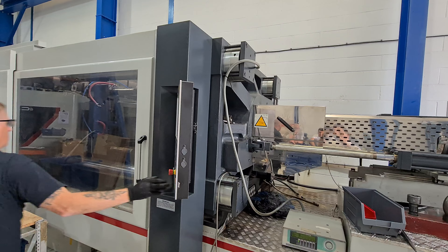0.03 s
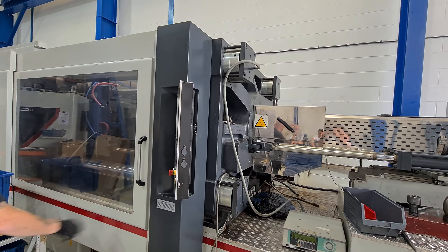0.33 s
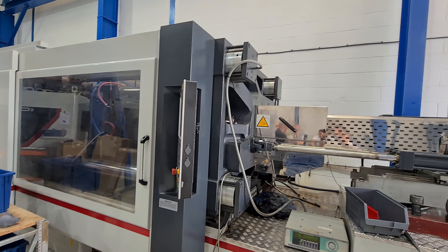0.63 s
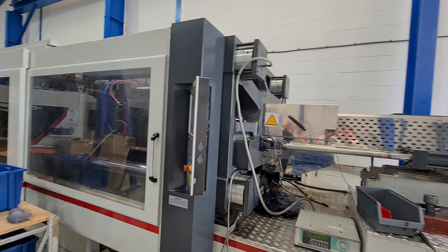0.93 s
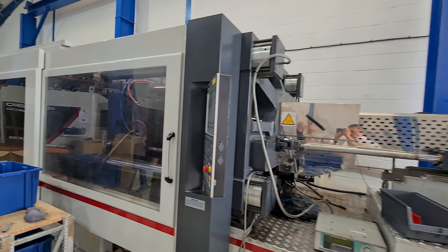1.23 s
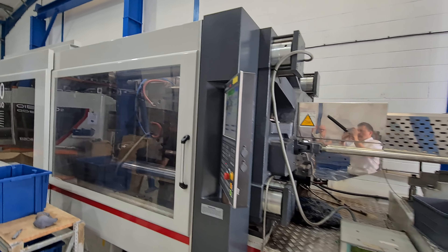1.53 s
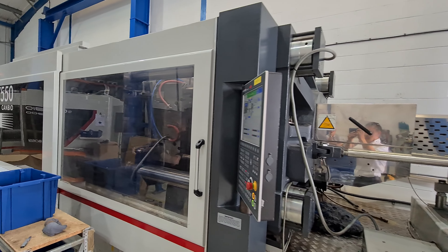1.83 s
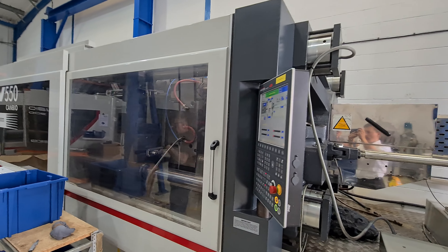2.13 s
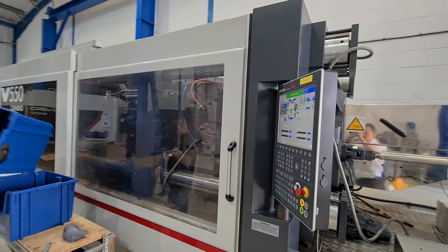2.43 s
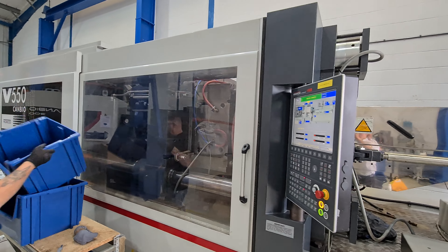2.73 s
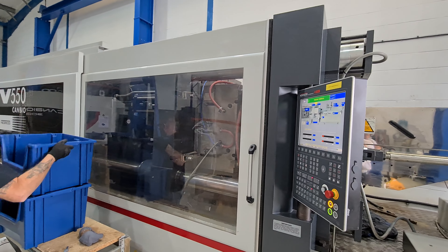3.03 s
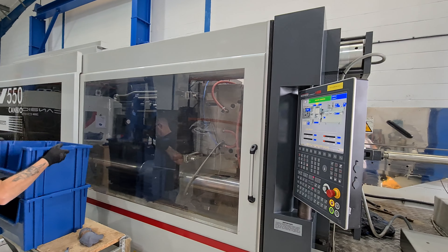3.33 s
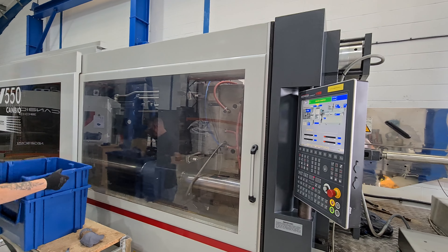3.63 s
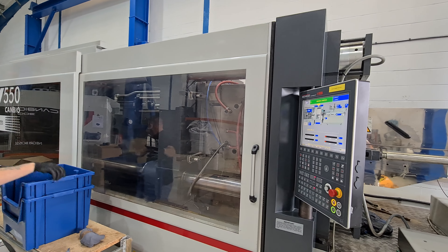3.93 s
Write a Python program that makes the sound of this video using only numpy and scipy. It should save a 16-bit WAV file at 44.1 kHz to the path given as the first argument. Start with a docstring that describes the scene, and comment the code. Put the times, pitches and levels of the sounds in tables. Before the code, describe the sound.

An injection moulding machine drones close by in a factory hall, its strong pump tone over a low motor hum and fans. The tone fades from about 2 to 3 seconds. A dull knock sounds far off near 2.1 seconds, and compressed air swells, peaking at 2.6. From 2.7 seconds an empty plastic crate drops into another, knocking and rubbing as it is shuffled into place until 3.8.

```python
"""The hydraulic pump of an injection moulding machine sings one strong tone, its second shaft order,
which fades over a second pump, a beating motor hum and the wash of fans in a factory hall.
Compressed air swells and dies away, and a dull knock sounds far off. Close by, an empty plastic crate
is dropped into another and shuffled into place: knocks, rubbing and a judder ring its walls."""
import sys
import numpy as np
from scipy import signal
from scipy.fft import rfft, irfft
from scipy.io import wavfile
from scipy.ndimage import uniform_filter1d

SR = 44100
rng = np.random.default_rng(int(sys.argv[2]) if len(sys.argv) > 2 else 0)


def transcribe(signal):
    """Save signal, clipped to [-1, 1], as a 16-bit WAV file at the path in sys.argv[1]."""
    frames = np.atleast_2d(signal).T
    limited = np.clip(frames, -1, 1)
    pcm = np.round(limited * 32767).astype(np.int16)
    wavfile.write(sys.argv[1], SR, pcm)


N = 176400
TIME = np.arange(N) / SR
SIDES = np.array([[1], [-1]])   # left, right; positive pan_db is left

# left-right likeness of the hall sound: freq_hz, correlation
COHERENCE = [(60, .99), (150, .98), (250, .93), (500, .68), (1000, .08), (2000, 0)]


def from_db(db):
    """Decibels to gain."""
    return 10 ** (np.asarray(db) / 20)


def unit_rms(x):
    """Scale to unit power."""
    return x / np.sqrt(np.mean(x ** 2) + 1e-20)


def in_time(rows):
    """Join (time_s, value) points by straight lines."""
    return np.interp(TIME, *np.transpose(rows))


def at_hz(points, hz):
    """Read (freq_hz, value) points on a log-frequency axis."""
    freqs_hz, values = np.transpose(points)
    return np.interp(np.log(hz), np.log(freqs_hz), values)


def pan(db):
    """Left and right gains at constant total power."""
    return unit_rms(from_db(SIDES * db / 2))


def drift(rate_hz):
    """Slow random motion, rms about 1."""
    pole = np.exp(-200 * np.pi * rate_hz / SR)
    slow = signal.lfilter([1], [1, -2 * pole, pole * pole], rng.standard_normal(N // 100 + 2002))[2000:]
    return np.interp(np.arange(N) / 100, np.arange(len(slow)), unit_rms(slow))


def dull(x, hz):
    """First-order low-pass."""
    return signal.sosfilt(signal.butter(1, min(hz, SR / 2 - 1000), fs=SR, output="sos"), x + 1e-18)


def gate(start_s, length_s, edge_s):
    """Envelope with linear fades in and out."""
    return np.clip(np.minimum(TIME - start_s, start_s + length_s - TIME) / edge_s, 0, 1)


def clicks(times_s, db):
    """One impulse per event."""
    out = np.zeros(N)
    np.add.at(out, np.clip((np.asarray(times_s) * SR).astype(int), 0, N - 1), from_db(db))
    return out


def decay(hits, t60_s):
    """Each impulse starts an exponential fade."""
    return signal.lfilter([1], [1, -from_db(-60 / (t60_s * SR))], hits + 1e-18)


def ring(hits, hz, t60_s):
    """Each impulse starts a damped sine."""
    r, w = from_db(-60 / (t60_s * SR)), 2 * np.pi * hz / SR
    return signal.lfilter([0, np.sin(w)], [1, -2 * r * np.cos(w), r * r], hits + 1e-18)


def phase_rad(hz):
    """Running phase of a varying frequency."""
    return 2 * np.pi * np.cumsum(hz) / SR


def noise(spectrum, low_cut_hz=36):
    """Stereo hall noise shaped by (freq_hz, density_db) points; rms 1."""
    # stereo balance: freq_hz, pan_db
    balance = [(200, 1), (600, -0.8), (1100, -3), (2200, -7.5), (4000, -4), (7000, -4.5), (10000, -8.5),
               (14000, -6.5)]
    hz = np.maximum(np.arange(N // 2 + 1) * SR / N, 1)
    mid, side = rfft(rng.standard_normal((2, N)))
    alike = np.clip(at_hz(COHERENCE, hz), -1, 1)
    stereo = np.sqrt(1 + alike) * mid + np.sqrt(1 - alike) * side * SIDES
    gain = from_db(at_hz(spectrum, hz) + SIDES * at_hz(balance, hz) / 2)
    return unit_rms(irfft(gain * stereo / np.sqrt(1 + (low_cut_hz / hz) ** 8), N))


def hall_tone(phase, shaft_hz, order, scatter=0.69):
    """One shaft order plus shifting reflections, less alike left and right as pitch rises; rms 1."""
    alike = np.clip(at_hz(COHERENCE, order * shaft_hz), 0, 1)
    mid, side = [drift(1.78) + 1j * drift(1.78) for _ in range(2)]
    echoes = (np.sqrt(1 + alike) * mid + np.sqrt(1 - alike) * side * SIDES) / 2
    direct = np.exp(1j * (rng.uniform(0, 2 * np.pi) + SIDES * np.arccos(alike) / 2))
    return unit_rms(np.real((direct + scatter * echoes) * np.exp(1j * order * phase)))


def fans():
    """Steady fan wash, coloured by many narrow cabinet resonances."""
    # fans and hall: freq_hz, density_db
    spectrum = [(40, -10.5), (60, -6), (85, -3.5), (140, -7.5), (175, -3), (270, -4), (400, -4.5),
                (620, -6.5), (850, -7.5), (1150, -5.5), (1350, -10), (1580, -15), (2000, -14.5),
                (2750, -14.5), (3300, -22.5), (5100, -30.5), (5700, -30.5), (6700, -29), (8400, -40),
                (12000, -41.5), (16000, -46.5)]
    bins = N // 2 + 1
    ripple_db = 1.5 * unit_rms(uniform_filter1d(rng.standard_normal(bins), size=90))
    ripple_db *= np.arange(bins) * SR / N > 990
    wash = unit_rms(irfft(rfft(noise(spectrum)) * from_db(ripple_db), N))
    return from_db(-27.5 + 0.56 * drift(17)) * wash


def rumble():
    """A few brief swells of low noise."""
    # Gaussian swells: peak_s, level_db, sigma_s
    swells = [(.06, -30, 0.08), (.44, -33, 0.041), (2.2, -33.5, 0.06), (2.94, -27.5, 0.02),
              (3.1, -40, 0.04)]
    # rumble: freq_hz, density_db
    spectrum = [(25, -11), (45, 4.5), (75, -5), (150, -8.5), (300, -31), (1000, -86)]
    envelope = sum(from_db(db) * np.exp(-.5 * ((TIME - s) / sigma_s) ** 2) for s, db, sigma_s in swells)
    return envelope * noise(spectrum)


def far_knock():
    """A distant blow, smeared by the hall."""
    # knock: freq_hz, density_db
    spectrum = [(100, -13), (220, -11), (700, -4), (1900, -9.5), (4000, -29), (9000, -68)]
    return decay(clicks(times_s=[2.135], db=-26), t60_s=0.64) * noise(spectrum)


def motor(hum_hz=113, beat_hz=2.266):
    """A low hum that swells; a weak tone just above beats against it."""
    # hum: time_s, level_db
    levels = [(0, -35.5), (.5, -40), (1, -31), (1.45, -43), (1.75, -33), (2.25, -30.5), (2.55, -44),
              (2.85, -33.5), (3.4, -29.5), (4, -40)]
    phase = phase_rad(hum_hz + 0.67 * drift(1.5))
    pair = np.cos(phase) + from_db(-23) * np.cos(phase + 2 * np.pi * beat_hz * TIME)
    return from_db(in_time(levels)) * unit_rms(pair)


def second_pump(shaft_hz=224.3, wander_hz=0.24):
    """A farther, faster pump of slightly wandering speed, whining at its second order."""
    # order 2: time_s, level_db
    whine_levels = [(0, -28.5), (.35, -29.5), (.65, -33), (.95, -30.5), (1.6, -33), (2.02, -32),
                    (2.35, -37.5), (2.6, -41.5), (2.87, -29.5), (3.1, -32), (3.5, -39), (4, -36)]
    # weak orders: order, level_db, pan_db
    orders = [(1, -34.5, 0), (3, -36, 0.89), (4, -54.5, -1), (5, -42.5, 0), (6, -45, -0.56)]
    # their late fade: time_s, gain_db
    fade = [(0, 0), (3.2, 0.5), (3.7, -10)]
    phase = phase_rad(shaft_hz + wander_hz * drift(0.7))
    whine = from_db(in_time(whine_levels)) * pan(-1.5) * hall_tone(phase, shaft_hz, 2, scatter=0.17)
    weak = sum(from_db(db) * pan(pan_db) * hall_tone(phase, shaft_hz, k) for k, db, pan_db in orders)
    return whine + from_db(in_time(fade)) * weak


def compressed_air():
    """Each release opens, holds and dies away; the vent whistles thinly; far releases are duller."""
    # releases: peak_s, gain_db, rise_s, hold_s, fall_db_per_s, lowpass_hz
    releases = [(0.247, -46.5, 0.086, .08, 9, 12000), (1.58, -41, 0.044, .02, 40, 6500),
                (2.633, -32.5, 0.5, 0.099, 21.5, 20100), (3.1, -44, 0.14, .02, 22, 4500)]
    # jet hiss: freq_hz, density_db
    spectrum = [(800, -32.5), (3000, 0.5), (5000, -1.5), (5800, 3.5), (6800, 2), (8400, -7.5),
                (11800, -8.5), (13500, -8.5), (16000, -7)]
    # vent whistles: pitch_hz, width_hz, relative_db
    vent = [(10900, 250, -19), (11600, 500, -14.5)]
    whistles = out = 0
    for hz, width_hz, db in vent:
        band = signal.lfilter(*signal.iirpeak(hz, hz / width_hz, fs=SR), noise(spectrum))
        whistles += from_db(db) * unit_rms(band)
    jet = from_db(0.78 * drift(12)) * (noise(spectrum) + whistles)
    for peak_s, db, rise_s, hold_s, fall_db_per_s, lowpass_hz in releases:
        opening = np.clip(1 + (TIME - peak_s) / rise_s, 0, 1) ** 1.48
        fall_db = fall_db_per_s * np.maximum(TIME - peak_s - hold_s, 0)
        out += dull(jet, lowpass_hz) * opening * from_db(db - fall_db)
    return out


def ticks():
    """Tiny bright clicks of plastic."""
    # ticks: start_s, level_db
    events = [(1.49, -45), (2.96, -35), (3.524, -42), (3.634, -43)]
    envelope = decay(clicks(*np.transpose(events)), t60_s=0.04)
    return envelope * noise([(2000, -13), (10000, -1), (15000, -9)])


def judder(start_s=2.941, length_s=0.034, slip_hz=183):
    """Stick-slip: a quick, nearly even run of soft blows as the crate wedges home."""
    cycles = phase_rad(slip_hz * (1 + 0.024 * drift(40)) * (TIME > start_s)) / (2 * np.pi)
    slips = np.diff(np.ceil(cycles), prepend=0) * (TIME < start_s + length_s)
    return from_db(-25.5) * dull(slips, hz=600)


def walls(drive, spread_db=1.5, low_cut_hz=136):
    """Crate walls ring, each contact favouring other modes; they are too small to radiate deep bass."""
    # wall modes: pitch_hz, gain_db, t60_s
    modes = [(102, -2, 0.08), (183, -7.5, 0.13), (199, 2.5, 0.12), (257, -3.5, 0.075), (302, 1.5, 0.04),
             (430, -11.5, 0.035), (566, -12, 0.046), (734, -9.5, 0.084)]
    rings = sum(from_db(db) * ring(drive * from_db(spread_db * drift(20)), hz, t60_s)
                for hz, db, t60_s in modes)
    return signal.sosfilt(signal.butter(3, low_cut_hz, "high", fs=SR, output="sos"), rings)


def crate(grains_per_s=1400, thud_gain_db=-9.5, clack_gain_db=-16.5, clack_t60_s=0.045):
    """Soft contacts thud, hard edges add a clack that echoes, rubbing walls ring and rasp."""
    # contacts: start_s, thud_db, clack_db, thud_lowpass_hz
    knocks = [(2.681, -10, 1.5, 1100), (2.713, -8, -1, 400), (2.769, -1, -20, 200), (2.787, -31, -7.5, 900),
              (2.824, -15, -18, 900), (2.848, -2.5, -9, 1100), (2.878, -13, -20, 900),
              (2.937, -4, -11, 200), (2.962, -16, -4, 900), (3, -14, -12, 300), (3.095, -15, -11, 900),
              (3.335, -12.5, -13, 350), (3.545, -12.5, -28, 500), (3.59, -14, -31, 300),
              (3.657, -14.5, -26, 498), (3.725, -16, -28, 400), (3.804, -19, -14, 900),
              (3.821, -9, -22, 900)]
    # wall rubs: start_s, length_s, level_db
    rubs = [(2.696, 0.353, -26.5), (2.986, 0.824, -34.5)]
    blows = sum(dull(clicks([s], db + thud_gain_db), hz) for s, db, _, hz in knocks)
    starts_s, _, clack_db, _ = np.transpose(knocks)
    edges = clicks(starts_s, clack_db + clack_gain_db)
    clack = decay(edges, clack_t60_s)
    echo = from_db(-13.5) * np.sqrt(decay(edges ** 2, 0.27))   # echoes add in power
    slips = (rng.random(N) < grains_per_s / SR) * rng.standard_normal(N)
    pressure = sum(from_db(db) * gate(start_s, length_s, edge_s=0.026) for start_s, length_s, db in rubs)
    rasp = pressure * from_db(-3.5) * unit_rms(decay(np.abs(slips), clack_t60_s))
    rubbing = pressure * unit_rms(walls(slips))
    thuds = walls(blows + judder())
    # clack, echo and rasp: freq_hz, density_db
    spectrum = [(100, -15), (550, 9), (1200, -9), (1700, -5.5), (2800, 0), (4000, -13), (7000, -29),
                (15000, -46)]
    return rubbing - thuds + np.sqrt(clack ** 2 + echo ** 2 + rasp ** 2) * noise(spectrum)


def main_pump():
    """A loud, clean second order with a faint reflection, two octaves above it and weak shaft orders."""
    # shaft rate: time_s, pitch_hz
    shaft = [(0, 175.1), (.15, 175.1), (0.281, 174.4), (2.4, 174.3), (2.7, 174.45), (4, 174.5)]
    # order 2: time_s, level_db, pan_db
    drone_track = [(0, -22, 2.5), (.17, -18.5, -2), (.3, -17, -1.5), (.5, -14.5, -0.5), (.9, -14.5, -1.7),
                   (1.7, -14.5, -3.5), (2.1, -17, -3), (2.5, -18, -2.5), (2.8, -22.5, -5),
                   (3.1, -29.5, -7.5), (3.6, -36.5, -12.5), (3.82, -30, -5), (4, -33, -2)]
    # order 4: time_s, level_db
    octave_levels = [(0, -34), (1.1, -38.5), (1.8, -40), (2.5, -41.5), (3, -33), (4, -35.5)]
    # weak orders: order, level_db, pan_db
    orders = [(1, -40.5, -0.5), (3, -50, 3.5), (5, -48, 5.5), (6, -43.5, 14), (7, -44.5, -1),
              (9, -57, 10.5), (10, -48, 1.5), (11, -52.5, -3.5), (12, -55, -6), (14, -54, -12)]
    phase, shaft_hz = phase_rad(in_time(shaft)), shaft[0][1]
    level_db = in_time([(s, db) for s, db, _ in drone_track])
    balance_db = in_time([(s, pan_db) for s, _, pan_db in drone_track])
    gain = from_db(level_db + SIDES * balance_db / 2 + 0.45 * drift(13))
    drone = gain * np.sqrt(2) * np.cos(2 * phase - 0.13 * SIDES)   # reaches the right side first
    echo = from_db(-39.5) * hall_tone(phase, shaft_hz, 2, scatter=0.4)
    octave = from_db(in_time(octave_levels)) * hall_tone(phase, shaft_hz, 4, scatter=0.22)
    whine = from_db(-42) * pan(-4) * hall_tone(phase, shaft_hz, 8, scatter=0.22)
    weak = sum(from_db(db) * pan(pan_db) * hall_tone(phase, shaft_hz, k) for k, db, pan_db in orders)
    return drone + echo + octave + whine + weak


def scene():
    """All sources, heard beside the machine."""
    machinery = main_pump() + second_pump() + motor() + fans() + rumble()
    return machinery + compressed_air() + far_knock() + crate() + ticks()


def record(dry):
    """Steep low-pass at 15750 Hz."""
    return signal.sosfilt(signal.ellip(12, .1, 80, 15750, fs=SR, output="sos"), dry)


dry = scene()
out = record(dry)
transcribe(out)
```